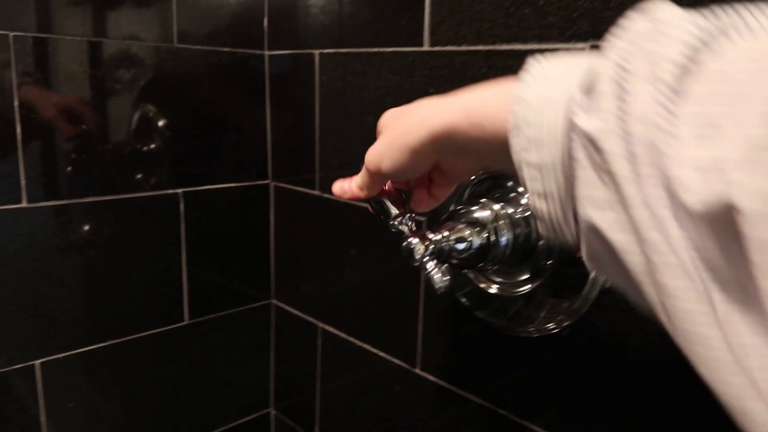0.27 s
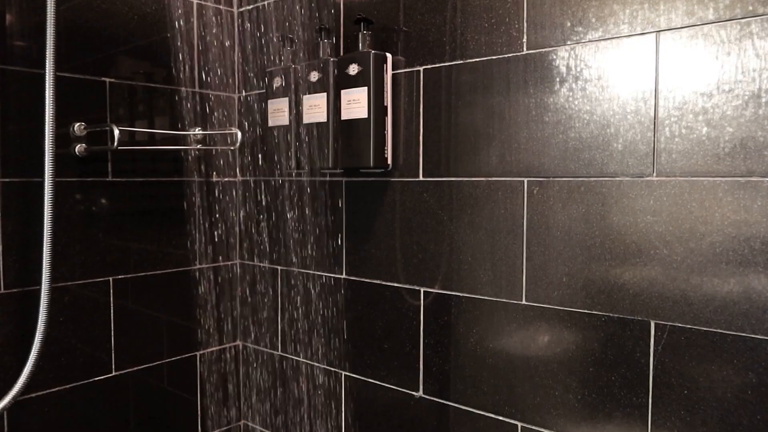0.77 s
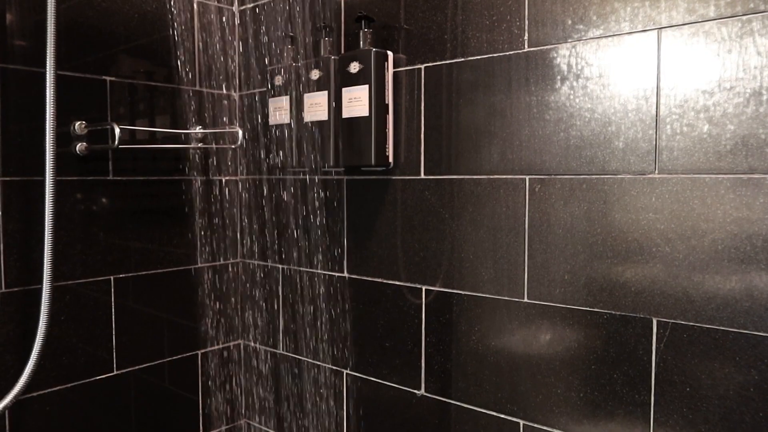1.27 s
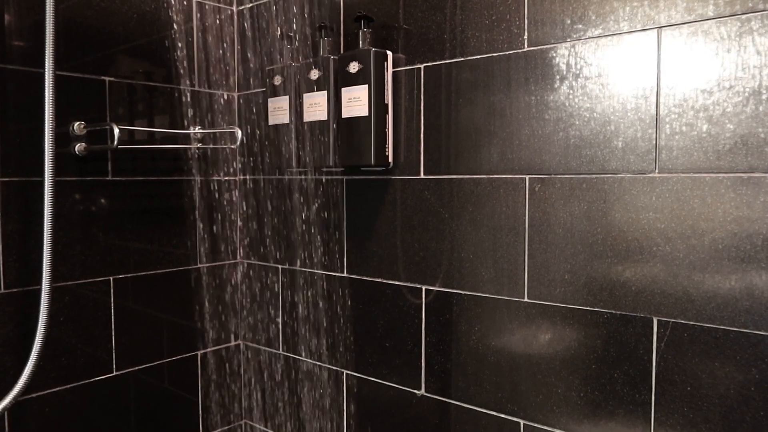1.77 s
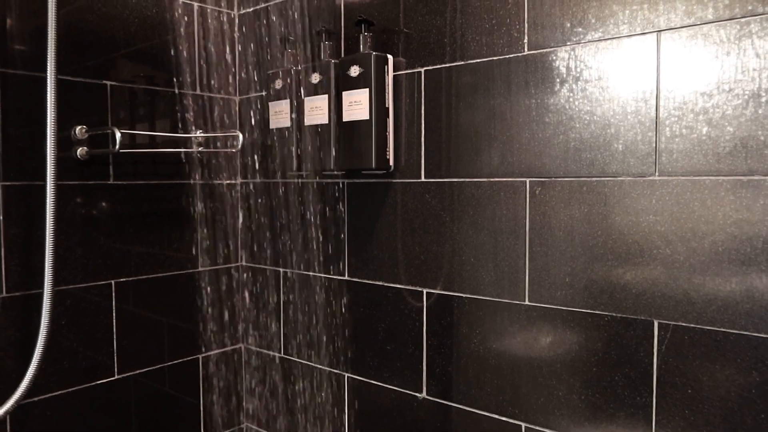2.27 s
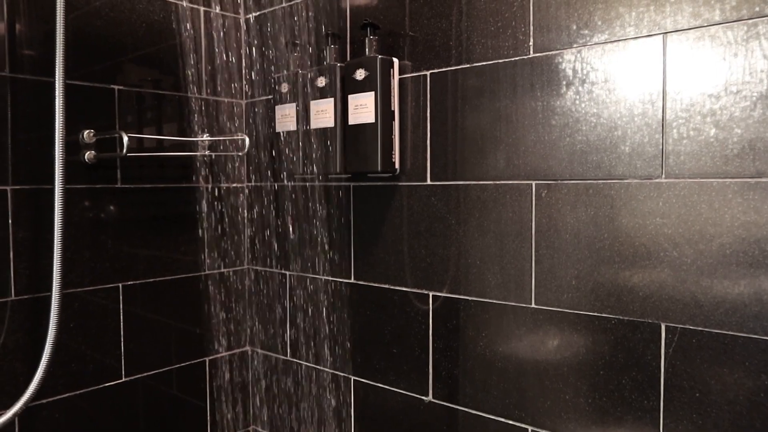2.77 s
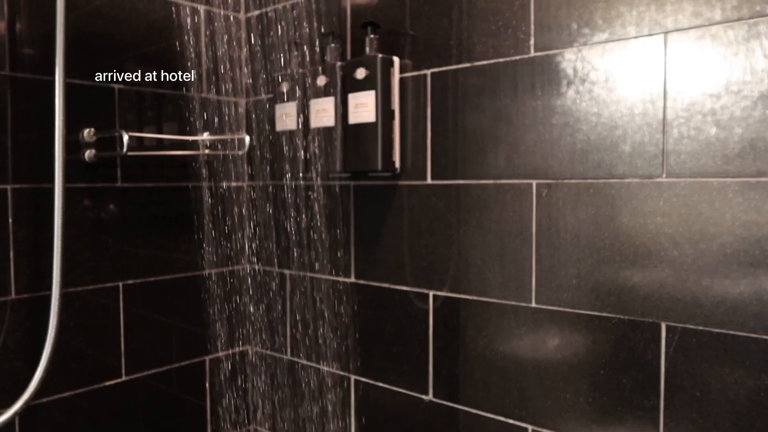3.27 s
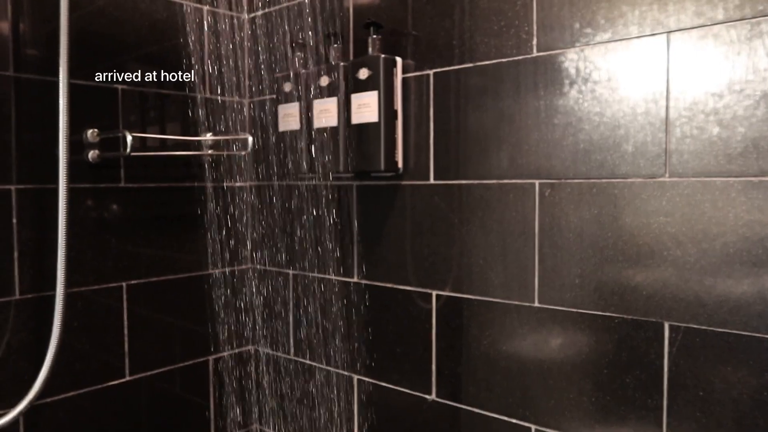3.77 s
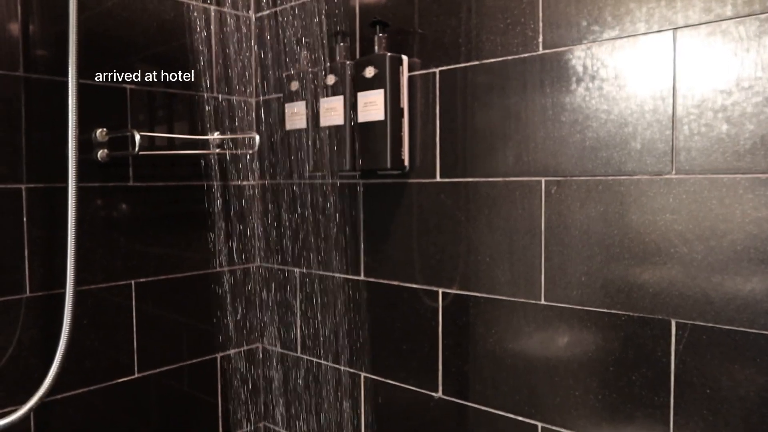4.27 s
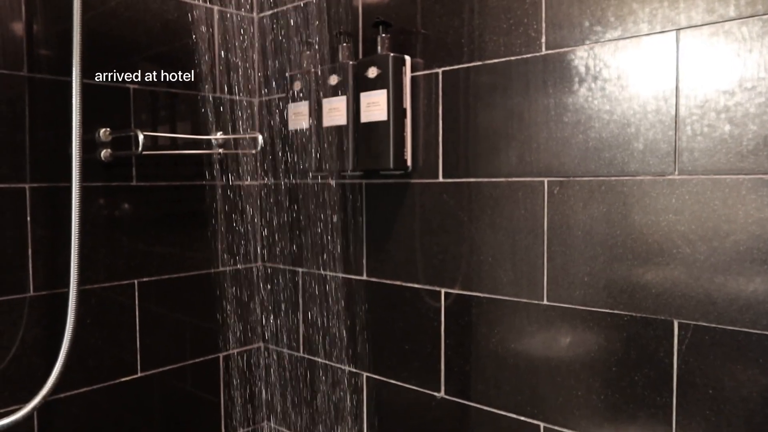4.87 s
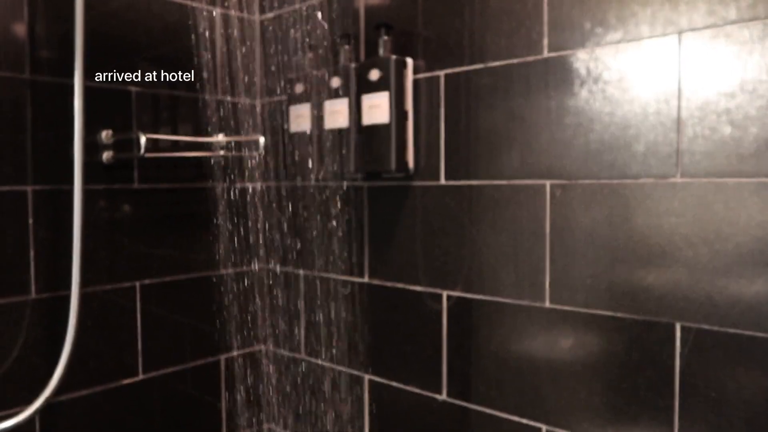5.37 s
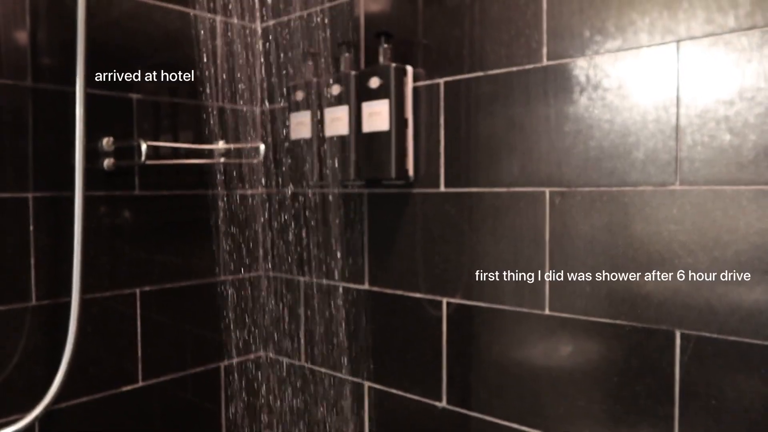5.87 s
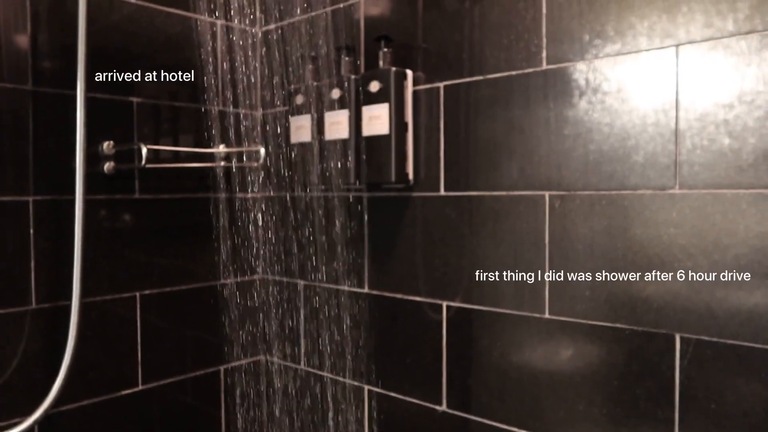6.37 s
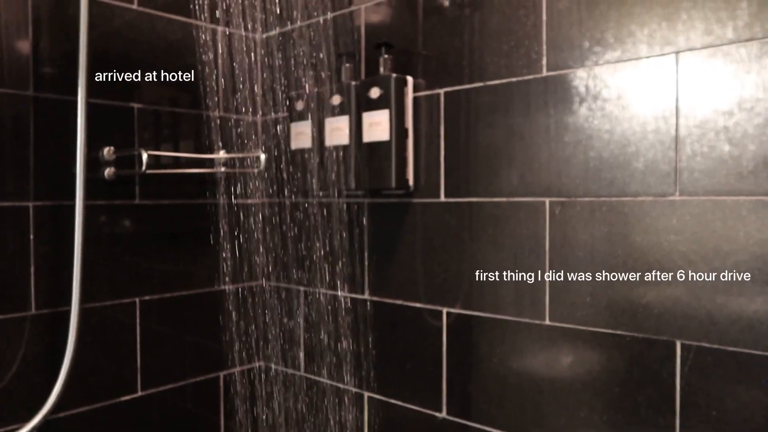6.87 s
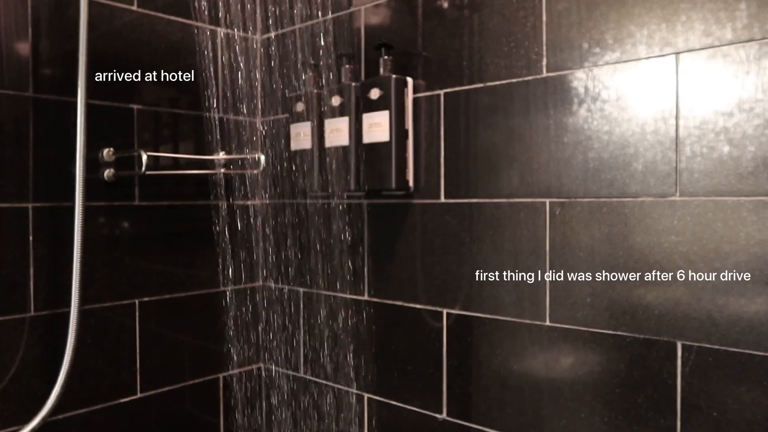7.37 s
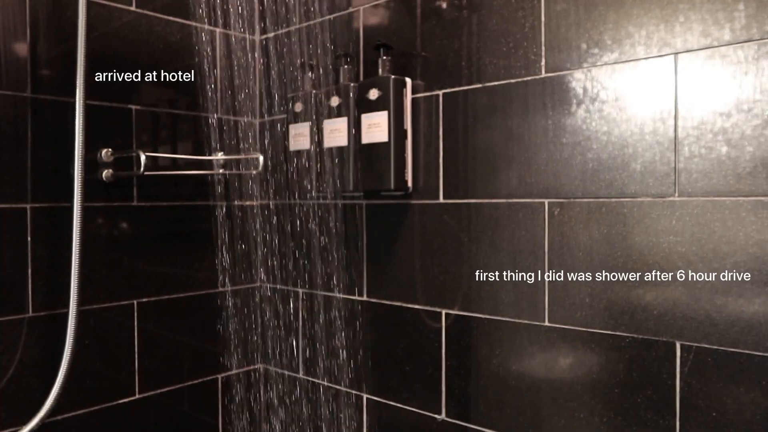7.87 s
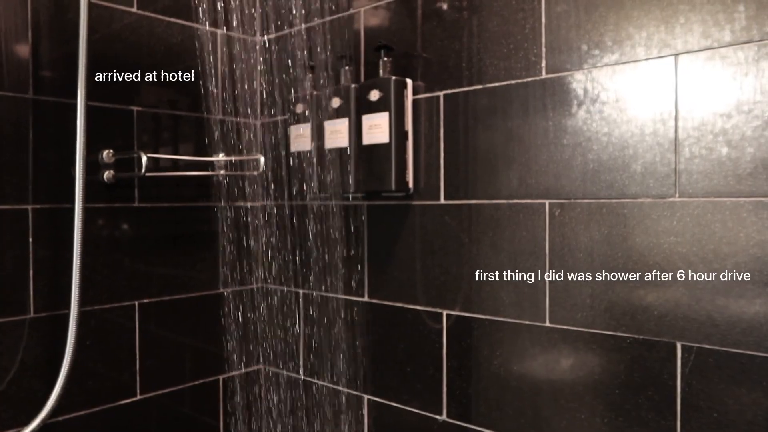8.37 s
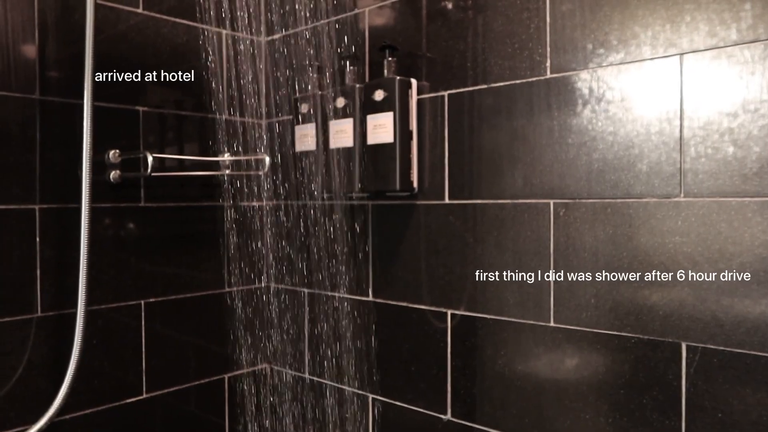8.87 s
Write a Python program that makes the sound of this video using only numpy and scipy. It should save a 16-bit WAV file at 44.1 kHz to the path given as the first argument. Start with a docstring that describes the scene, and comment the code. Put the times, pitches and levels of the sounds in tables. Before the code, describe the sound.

A shower valve squeaks open with a swelling hiss of pipe water, then an abrupt cut to steady, dense spray pattering on hard tile.

```python
"""A hard tiled shower stall: a valve opens, water hisses through the pipe, then a cut to the full spray.
The spray is restless noise coloured by the stall's air modes; its treble surges now and then.
Fat drops are noise bursts, slap then spatter, that ring the drain. The valve is flow noise with
a fuzzy squeal and a pipe rush. A mains-driven fan hums in steady tones over a low rumble.
The treble is wide, the bass in the middle."""
import sys
import numpy as np
from scipy import signal
from scipy.io import wavfile
from scipy.ndimage import uniform_filter1d

SR = 44100
rng = np.random.default_rng(int(sys.argv[2]) if len(sys.argv) > 2 else 0)


def convert_level_to_amplitude(level_db):
    """Map a level in decibels to its linear amplitude factor."""
    exponent = np.asarray(level_db, float) / 20
    return 10 ** exponent


def inscribe(sig):
    """Save sig as 16-bit PCM at rate SR to the path in sys.argv[1].

    A 1-D sig is mono; a 2-D sig holds one channel per row.
    Samples are clipped to [-1, 1] before scaling.
    """
    pcm = np.round(np.clip(np.atleast_2d(sig).T, -1, 1) * 32767)
    wavfile.write(sys.argv[1], SR, pcm.astype(np.int16))


N = 402191
T = np.arange(N) / SR
CUT_S, FADE_OUT_S, FADE_IN_S, END_S = 0.7245, 0.0019, 0.017, 9.083

# spray spectrum before scaling: (frequency [Hz], density [dB per Hz])
SPRAY_SPECTRUM = [(20, -30), (35, -10), (110, -14), (183, -9.5), (240, -4.5), (300, -7), (460, -7),
                  (640, -8.5), (900, -10), (1330, -13.5), (1900, -13.5), (3300, -13), (5100, -11.5),
                  (6500, -14.5), (12500, -18.5), (14400, -20.5), (15300, -34)]
# stereo width of spray and splats: (frequency [Hz], side against middle [dB])
SPRAY_WIDTH = [(30, -40), (80, -60), (200, -15), (380, -20.5), (700, -24), (1290, -34), (2000, -20),
               (3000, -12), (4400, -7), (8120, -0.5), (11000, 3), (14400, 6), (15300, 14.5)]
# air modes of the tiled stall: (frequency [Hz], width [Hz], level over the wash [dB])
STALL_MODES = [(38.05, 3.425, 16), (57.35, 6.054, 4), (95.4, 12.414, 13), (120, 13.93, -2),
               (150.5, 32.37, 7), (245.4, 15.4, 4), (262.3, 6, 12.5), (352.4, 22.74, 10),
               (442.52, 3.6, 18.5), (493.7, 19, 10), (497.5, 10.05, -7), (569, 23, 4.5), (734, 25, -3.5),
               (810, 9.1, -17), (880, 28, 6.5), (1000, 22.5, 7), (1205, 34, 5.5), (1409, 24.6, -6.5),
               (1530, 95, 6), (1590, 27, 7), (1657, 13.5, 10), (2310, 35.96, 1.5), (3000, 75, 3),
               (4500, 34.6, 1)]
# surges in the fine hiss of the jets: (time [s], treble rise [dB])
HISS_SURGES = [(.83, 3.5), (1.09, 2.5), (1.37, 3), (2.17, 0.8), (3.19, 2.2), (3.29, 1.5), (3.53, 1.5),
               (3.7, 2.5), (3.92, 3), (4.09, 4), (4.78, 1.8), (5.26, 1), (5.49, 1), (5.65, 1.5), (6.1, 1.2),
               (6.79, 1.5), (6.92, 1.5), (7.5, 1), (8.08, 2.2), (8.42, 0), (8.8, 0.5)]
SURGE_RISE_S, SURGE_FALL_S = 0.024, 0.026
SPRAY_DB = -26.5  # rms


def spray():
    """The wash of small drops on tile: surging noise through the stall's tail and air modes."""
    t = T[::128]
    surge_db = np.zeros(len(t))
    for s, db in HISS_SURGES:
        spread_s = np.where(t < s, SURGE_RISE_S, SURGE_FALL_S)
        surge_db += db * np.exp(-((t - s) / spread_s) ** 2)
    noise = restless(t, surge_db, SPRAY_WIDTH, patchy_db=0.75, gust_db=2.0, grain_db=0.05, tilt_hz=1640)
    wash = colour(reverb(noise), SPRAY_SPECTRUM, STALL_MODES[2:])
    return evened(wash) * convert_level_to_amplitude(SPRAY_DB)


# fat drops: (time [s], level [dB], centre [Hz], bandwidth [share of centre])
FAT_DROPS = [(.816, -20, 12110, 0.17), (.878, -22, 3830, .21), (.962, -25.5, 880, 0.21),
             (1.080, -21.5, 880, 0.19), (1.16, -26, 880, .27), (1.342, -27, 1524, .34),
             (1.619, -25, 880, 0.32), (1.911, -16, 1613, 0.48), (1.97, -22, 2677, 0.5),
             (2.005, -32, 1570, 0.23), (2.135, -28, 880, .29), (2.281, -27, 880, .31),
             (2.392, -22, 2903, 0.2), (2.644, -24, 1570, 0.39), (2.689, -17, 2600, 0.45),
             (2.689, -25, 4270, .1), (2.72, -17.5, 760, .26), (2.895, -24, 880, 0.33),
             (2.995, -24, 2398, 0.76), (3.1, -29, 1620, .2), (3.133, -28, 1490, .29),
             (3.694, -16, 7080, 0.5), (4.057, -23.5, 1530, .29), (4.085, -24, 880, .3),
             (4.17, -24, 2920, .2), (4.351, -28, 2310, .23), (4.378, -23.5, 2310, .45),
             (4.58, -19.5, 880, .32), (4.678, -19.5, 2087, 0.84), (4.736, -15, 3950, 0.2),
             (4.978, -23, 1470, .41), (5.116, -24, 1618, 0.19), (5.359, -19, 4252, 0.52),
             (5.557, -28, 858, .35), (5.832, -28, 1518, 0.39), (5.885, -24, 3040, .15),
             (6.037, -26.5, 1630, 0.24), (6.19, -24, 880, .3), (6.298, -22, 880, 0.83),
             (6.684, -26, 2320, .3), (6.871, -22.5, 1568, .32), (6.920, -25.5, 2310, 0.21),
             (6.921, -26, 880, 0.35), (7.44, -25, 2900, .2), (7.543, -24, 2960, .3), (7.68, -25, 3020, .15),
             (7.942, -22.5, 880, 0.32), (8.262, -24.5, 880, 0.24), (8.298, -20, 880, 0.3),
             (8.340, -15.5, 7640, 0.3), (8.372, -25, 2310, .25), (8.45, -27, 2310, .25),
             (8.514, -25, 1730, .25), (8.555, -23, 1510, 0.35), (8.831, -22, 1210, 0.26),
             (8.971, -28, 2247, .27)]
# hollow under the spray, likely the drain pipe: (frequency [Hz], width [Hz], level over the slap [dB])
DRAIN_MODES = [(740, 50, 6), (880, 50, 12), (1520, 80, 10), (1640, 60, 9), (2310, 80, 11), (2900, 120, 8),
               (3050, 100, 5), (3790, 200, 5), (4270, 200, 5)]
SLAP_RISE_S, SLAP_DECAY_S = 0.0024, 0.0031
SPATTER_DB, SPATTER_S = -8.5, 0.029  # holds, then is about 9 dB down after this long
TRAIL_DB, TRAIL_DECAY_S = -12.5, 0.096  # stray droplets
LUMP_DB = 2.5  # rms raggedness of spatter and trail
SMALL_PER_S, SMALL_MIN_DB, SMALL_SPREAD_DB, SMALL_SHARE = 40, -34.5, 4, 0.35


def splats():
    """Each drop: slap and spatter of noise around its centre, ringing the drain and the stall's tail."""
    out, t = np.zeros((2, N)), T[:SR // 5]
    small = []
    for a, b, c in rng.random((round(SMALL_PER_S * N / SR), 3)):
        db = SMALL_MIN_DB - SMALL_SPREAD_DB * np.log(1 - 0.9 * b)
        small.append((a * N / SR, db, 780 * 6 ** c ** 3, SMALL_SHARE))  # mostly low centres
    slap = np.exp(-t / SLAP_DECAY_S)
    spatter = convert_level_to_amplitude(SPATTER_DB) * np.exp(-(t / SPATTER_S) ** 2)
    spatter += convert_level_to_amplitude(TRAIL_DB) * np.exp(-t / TRAIL_DECAY_S)
    rise = np.minimum(t / SLAP_RISE_S, 1)
    for s, db, hz, share in FAT_DROPS + small:
        puff = ring(complex_noise(2, len(t)), hz, np.clip(share, 0.02, 0.9) * hz)
        puff[1] *= convert_level_to_amplitude(read(SPRAY_WIDTH, hz))
        lump_noise = uniform_filter1d(rng.standard_normal(len(t)), size=220)  # 5 ms
        lumps = convert_level_to_amplitude(LUMP_DB * evened(lump_noise))
        splat = puff * (slap + spatter * lumps) * rise * convert_level_to_amplitude(db) / 3  # noise peaks near 3 rms
        part = out[:, round(s * SR):][:, :len(t)]
        part += splat[:, :part.shape[1]]
    return reverb(colour(out, [(20, 0), (20000, 0)], DRAIN_MODES))


# flow through the valve: (time [s], level [dB])
FLOW_LEVEL = [(0, -37), (.07, -36.5), (.26, -34.5), (.45, -29.5), (.72, -28.5)]
# flow noise spectrum before scaling: (frequency [Hz], density [dB per Hz])
FLOW_SPECTRUM = [(15, -57), (25, -13), (119, -11), (182, -4), (237, -3), (286, -5), (802, -6.5),
                 (1260, -7.5), (1920, -11), (9410, -33.5), (11600, -37.5), (12600, -56.5), (14000, -51)]
# whistling bands of valve and pipe: (frequency [Hz], width [Hz], level over the flow noise [dB])
WHISTLES = [(502.3, 58, 8), (1070, 27, 13.5), (1245.7, 19, 7), (1274, 19.2, 10), (1487.4, 64, 8),
            (3677.7, 310, 2), (4670, 230, 11.5), (5080, 208, 13.5), (6540, 200.4, 10.5),
            (8100, 180.8, 10.5), (9140, 161.5, 12.5), (13300, 221, 23)]
# stereo width of the flow: (frequency [Hz], side against middle [dB])
FLOW_WIDTH = [(60, -32), (110, -36), (200, -23), (380, -21.5), (700, -25.5), (1290, -24.5), (2380, -11),
              (4400, -6), (8120, 2), (15000, 9.5)]
# squeal, then rush: (frequency [Hz], width [Hz])
SQUEAL_AND_RUSH = [(3660, 110), (1290, 200)]
# narrowest jet in the valve seat: squeal and treble peak together, then fade as the gap widens
NARROW_S, SQUEAL_DB, SQUEAL_RISE_DB_PER_S, SQUEAL_FALL_DB_PER_S = 0.18, -36, 120, 65
BRIGHT_DB, BRIGHT_SHARE = 13, 0.8
# the pipe fills: its rush sets in, swells to a peak, then drops away
FILL_S, FULL_S, RUSH_DB, RUSH_RISE_DB_PER_S, RUSH_FALL_DB_PER_S = 0.22, 0.6, -32, 22, 55


def valve():
    """Turbulent flow through the opening valve: fuzzy squeal at a narrow gap, rush as the pipe fills."""
    t = T[T < CUT_S]
    narrow_db = hump(NARROW_S, SQUEAL_RISE_DB_PER_S, SQUEAL_FALL_DB_PER_S)
    treble_db = np.maximum(BRIGHT_DB + BRIGHT_SHARE * narrow_db, 0)[:len(t)]
    noise = restless(t, treble_db, FLOW_WIDTH, patchy_db=2.5, gust_db=1.5, grain_db=0.1, tilt_hz=3014.8)
    flow = evened(colour(reverb(noise), FLOW_SPECTRUM, WHISTLES + STALL_MODES[2:12]))
    out = flow * convert_level_to_amplitude(np.interp(T, *np.transpose(FLOW_LEVEL)))
    squeal_gain = convert_level_to_amplitude(SQUEAL_DB + narrow_db)
    rush_gain = convert_level_to_amplitude(RUSH_DB + hump(FULL_S, RUSH_RISE_DB_PER_S, RUSH_FALL_DB_PER_S))
    rush_gain *= np.minimum(T / FILL_S, 1) ** 2
    for (hz, width_hz), gain in zip(SQUEAL_AND_RUSH, [squeal_gain, rush_gain]):
        band = ring(complex_noise(2, N), hz, width_hz)
        band[1] *= convert_level_to_amplitude(read(FLOW_WIDTH, hz))
        out += band * gain
    return out


# fan tones: (frequency [Hz], rms before the cut [dB], rms after it [dB])
FAN_TONES = [(120.6, -39.5, -41), (239.7, -36.5, -31.5)]


def hum():
    """Mains-driven fan: steady tones near twice and four times the mains frequency, dead centre."""
    mid = np.zeros(N)
    for hz, early_db, late_db in FAN_TONES:
        rms = convert_level_to_amplitude(np.where(T > CUT_S, late_db, early_db))
        mid += np.sqrt(2) * rms * np.sin(2 * np.pi * (hz * T + rng.random()))
    return np.array([mid, 0 * T])


# two lowest air modes: (frequency [Hz], width [Hz], relative level [dB])
LOW_MODES = [(37.7, 6.2, 1.5), (57.077, 5.4, 3)]
RUMBLE_PEAK_S, RUMBLE_DB, RUMBLE_RISE_DB_PER_S, RUMBLE_FALL_DB_PER_S = 1.5, -40.5, 4.5, 1.5


def rumble():
    """The two lowest air modes, fed by the building's faint shaking, swell and then ebb."""
    low = sum(convert_level_to_amplitude(db) * ring(complex_noise(N), hz, width_hz) for hz, width_hz, db in LOW_MODES)
    gain = convert_level_to_amplitude(RUMBLE_DB + hump(RUMBLE_PEAK_S, RUMBLE_RISE_DB_PER_S, RUMBLE_FALL_DB_PER_S))
    return np.array([evened(low), 0 * T]) * gain


def restless(s, treble_db, side, patchy_db, gust_db, grain_db, tilt_hz):
    """Middle and side noise with drifting patches, wide gusts, millisecond grain and a moving treble."""
    frames, hz = N // 128 + 5, np.fft.rfftfreq(512, 1 / SR)
    a, b, c, d, patches = rng.standard_normal((frames, 257, 5)).T
    patches = uniform_filter1d(patches, size=14, axis=0)
    patches = evened(uniform_filter1d(patches, size=18, axis=1))
    gust = rng.standard_normal((frames, 257)).T
    gust = uniform_filter1d(gust, size=70, axis=0)  # some 6 kHz wide
    gust = evened(uniform_filter1d(uniform_filter1d(gust, size=6), size=6))  # some 20 ms long
    high = (hz / (hz + tilt_hz))[:, None]  # acts mostly on the treble
    moving_db = np.interp(np.arange(frames) * 128 / SR, s, treble_db)
    field_db = patchy_db * patches * (hz / (hz + 300))[:, None]
    field_db += high * (gust_db * gust + moving_db - moving_db.mean())
    side_gain = convert_level_to_amplitude(read(side, hz))[:, None]
    z = np.array([a + 1j * b, (c + 1j * d) * side_gain]) * convert_level_to_amplitude(field_db)
    noise = signal.istft(z, nperseg=512, noverlap=384)[1][:, :N]
    grain = evened(uniform_filter1d(rng.standard_normal(N), size=40))
    return noise * convert_level_to_amplitude(grain_db * grain)


TAIL_FROM_HZ = 950  # below this the stall answers with separate modes, above with a dense tail
STALL_T60_S, STALL_WET = 0.94, 0.46  # wet amplitude applies to the tail before its high-pass


def reverb(x):
    """Dense stall tail: random-sign taps, one every half millisecond, other taps for middle and side."""
    at = np.arange(130, SR // 2, 22)
    taps = np.zeros((2, SR // 2 + 22))
    decay = convert_level_to_amplitude(-60 * at / SR / STALL_T60_S)
    for row in taps:
        places = at + rng.integers(0, 22, len(at))
        row[places] = rng.choice([-1., 1.], len(at)) * decay
    high_pass = signal.butter(2, TAIL_FROM_HZ, "high", fs=SR, output="sos")
    taps = signal.sosfilt(high_pass, taps / np.linalg.norm(taps[0]))
    return x + STALL_WET * signal.fftconvolve(x, taps, axes=1)[:, :N]


def colour(x, spectrum, modes, size=16384):
    """Causal (minimum-phase) filter: a smooth spectrum with resonances standing on it."""
    hz = np.abs(np.fft.fftfreq(size, 1 / SR))
    power = 1 + sum(convert_level_to_amplitude(2 * db) / (1 + (2 * (hz - f) / width_hz) ** 2) for f, width_hz, db in modes)
    smooth = convert_level_to_amplitude(np.maximum(read(spectrum, hz), -100))
    log_gain = np.log(smooth) + 0.5 * np.log(power)
    response = np.exp(np.conj(signal.hilbert(log_gain)))
    taps = np.fft.ifft(response).real[:size // 2]
    return signal.oaconvolve(x, taps[None], axes=1)[:, :N]


def ring(x, hz, width_hz):
    """A steep resonance on complex noise: smoothed twice, shifted up to its pitch."""
    r = np.exp(-np.pi * width_hz / SR)
    once = signal.lfilter([1], [1, -r], x)
    low = signal.lfilter([1], [1, -r], once)
    carrier = np.exp(2j * np.pi * hz * T[:x.shape[-1]])
    return evened((low * carrier).real)


def complex_noise(*shape):
    """Random size and phase."""
    return rng.standard_normal(shape) + 1j * rng.standard_normal(shape)


def hump(at_s, rise_db_per_s, fall_db_per_s):
    """Zero dB at its top, falling in straight lines before and after."""
    return -np.where(T < at_s, rise_db_per_s * (at_s - T), fall_db_per_s * (T - at_s))


def read(points, hz):
    """Straight lines on a log-frequency axis."""
    f, value = np.transpose(points)
    return np.interp(np.log(hz + 1), np.log(f + 1), value)


def evened(x):
    """Scales to rms 1."""
    return x / np.sqrt(np.mean(x ** 2) + 1e-20)


def scene():
    """Valve, cut, spray with splats; hum and rumble on both sides; middle and side to left and right."""
    before = np.clip((CUT_S - T) / FADE_OUT_S, 0, 1)
    after = np.clip((T - CUT_S) / FADE_IN_S, 0, 1) * (T < END_S)
    room = hum() + rumble()
    water = valve() * before + (spray() + splats()) * after
    mid, side = water + room * (before + after)
    return np.array([mid + side, mid - side])


def low_pass(x):
    """Removes everything above the highest recorded frequency."""
    return signal.sosfilt(signal.butter(12, 15810, fs=SR, output="sos"), x)


def record(dry):
    """Delivers the finished mix."""
    return low_pass(dry)


dry = scene()
out = record(dry)
inscribe(out)
```